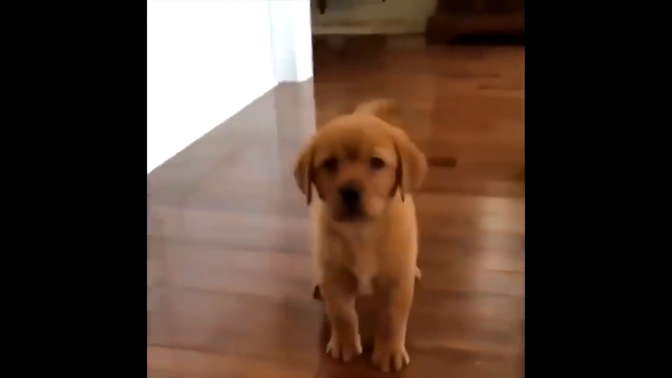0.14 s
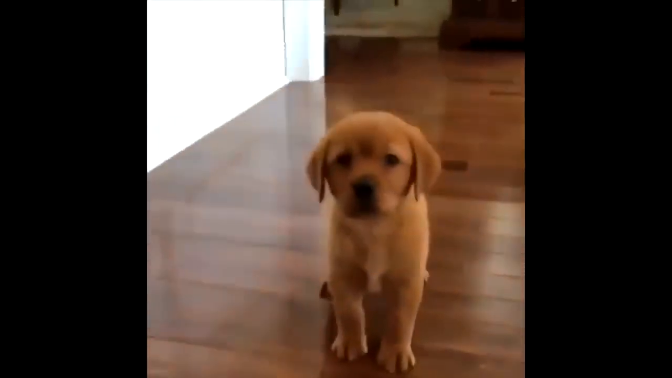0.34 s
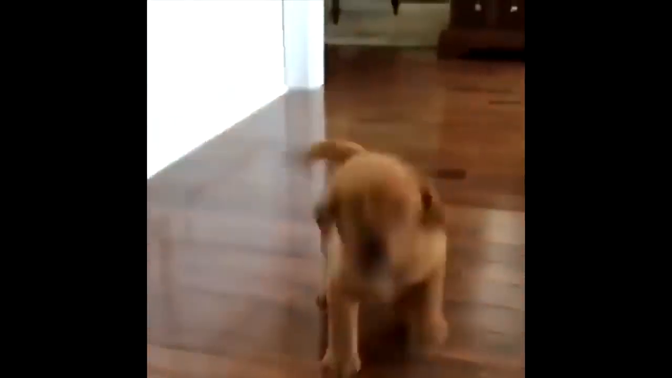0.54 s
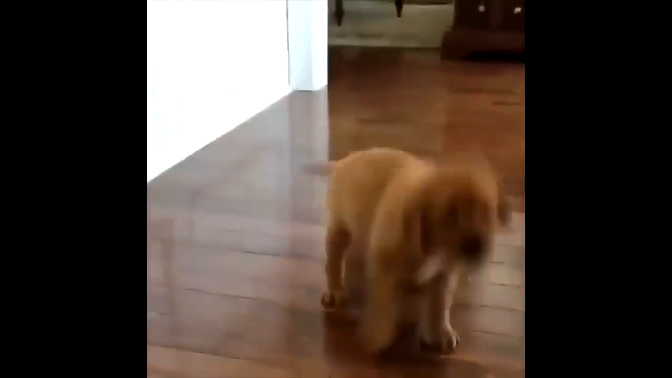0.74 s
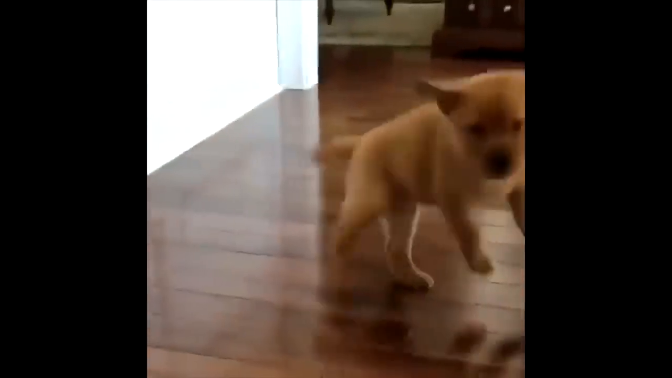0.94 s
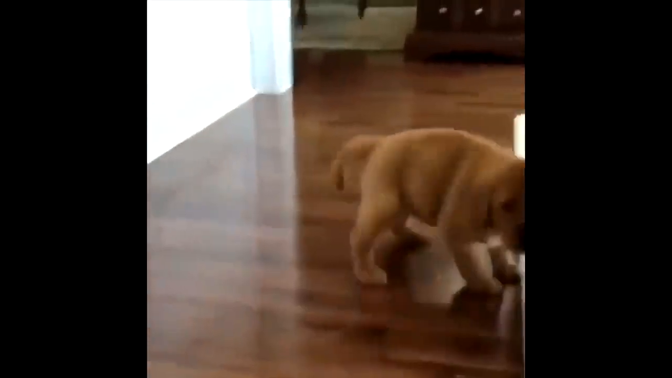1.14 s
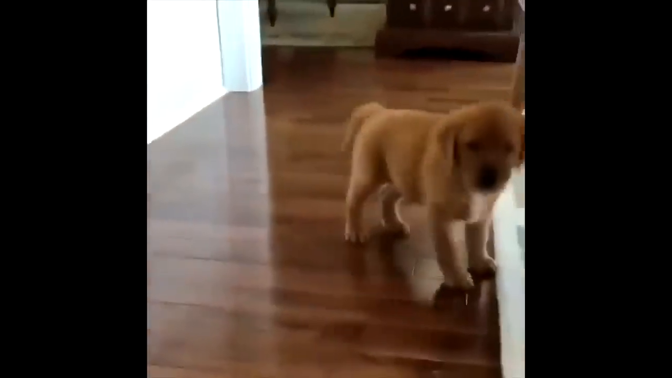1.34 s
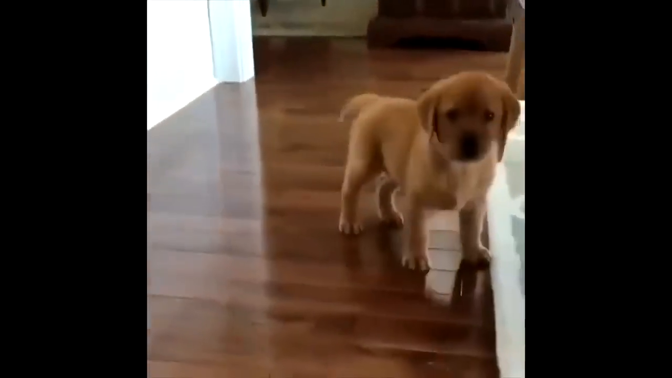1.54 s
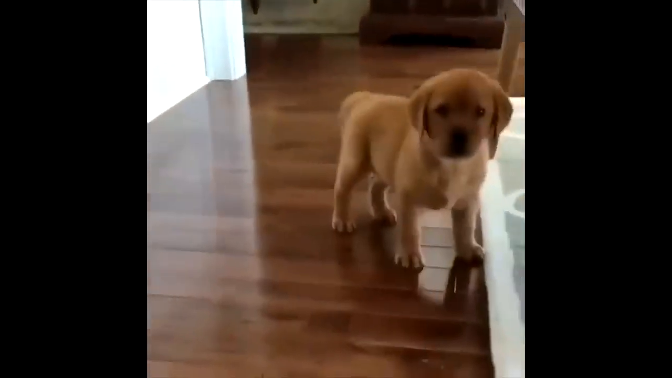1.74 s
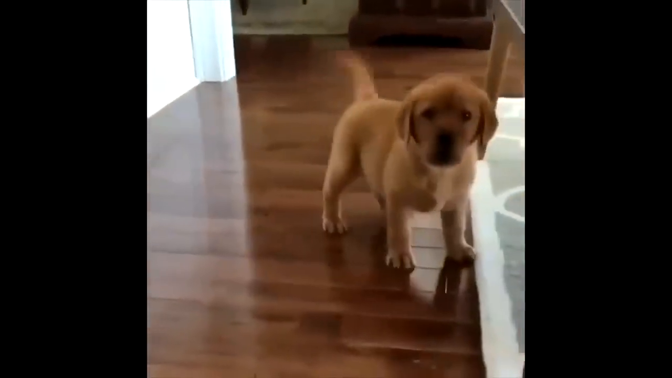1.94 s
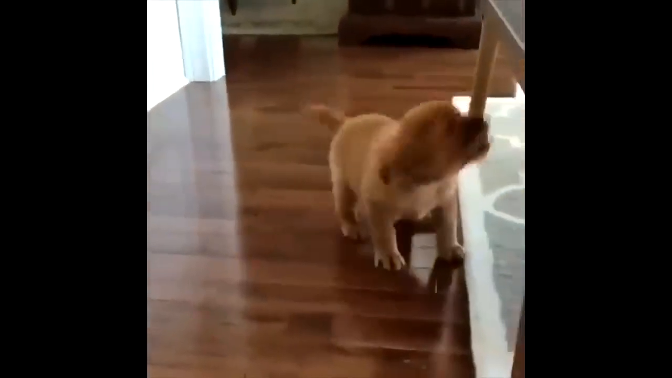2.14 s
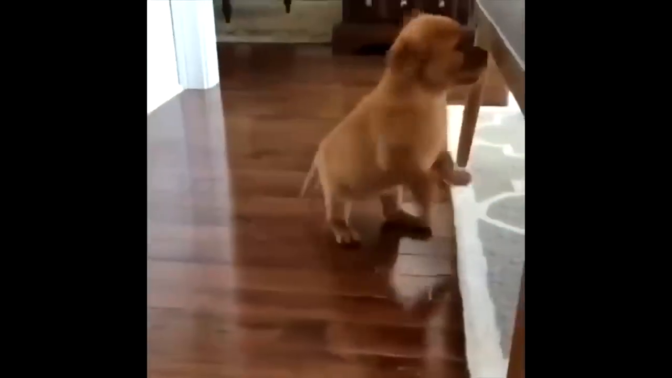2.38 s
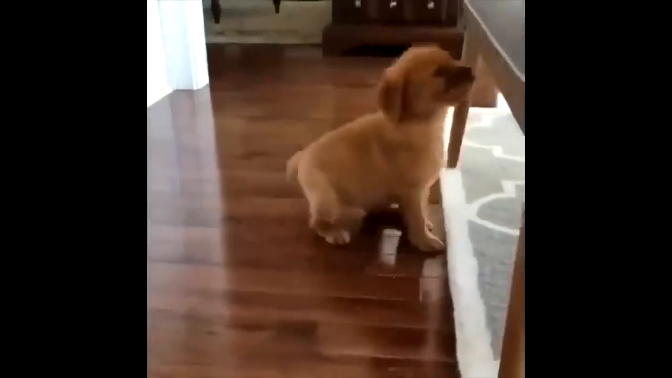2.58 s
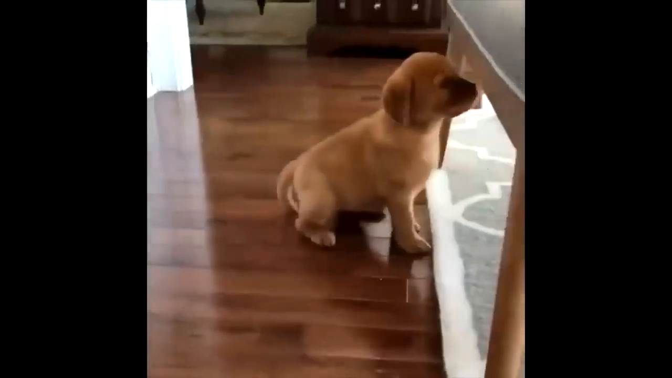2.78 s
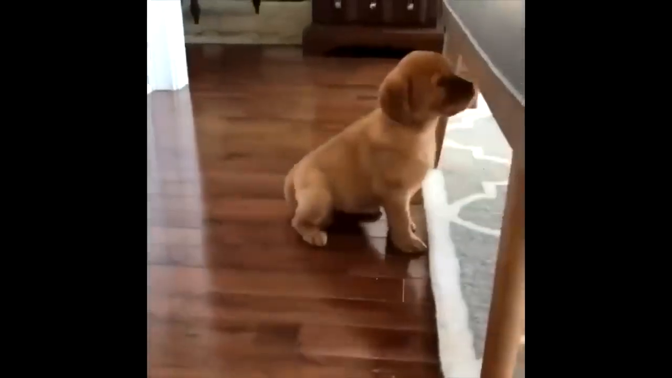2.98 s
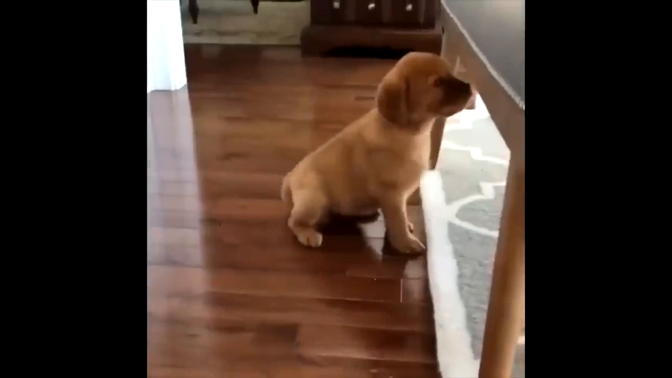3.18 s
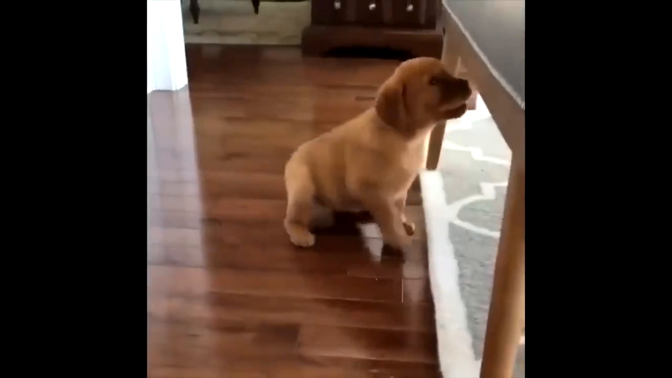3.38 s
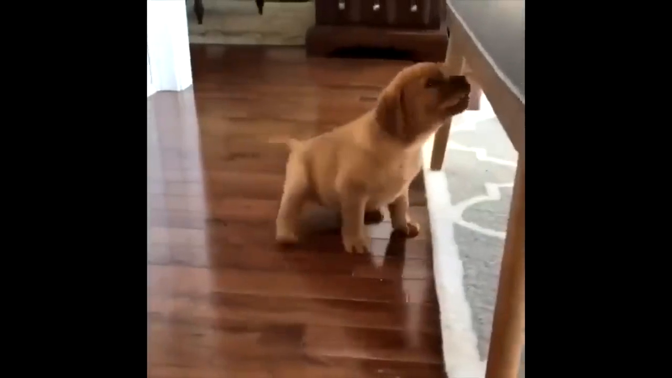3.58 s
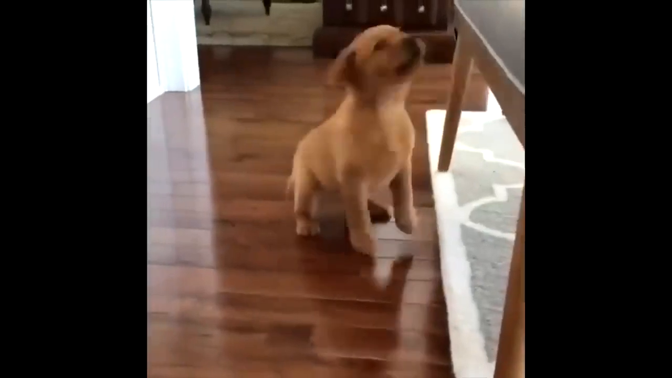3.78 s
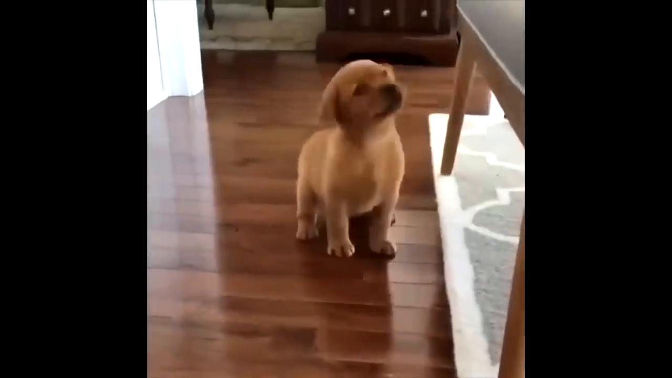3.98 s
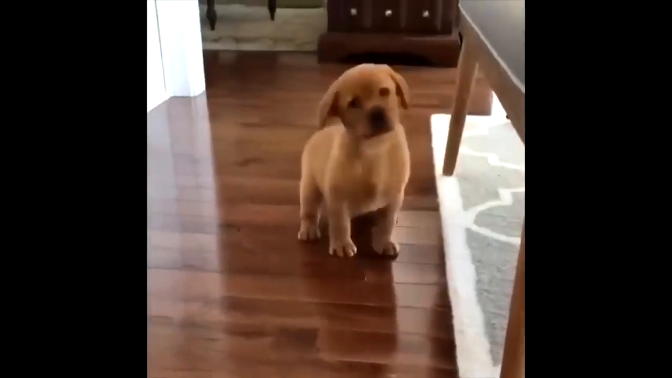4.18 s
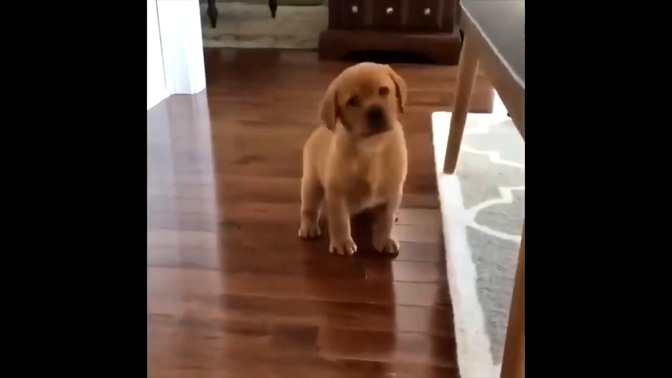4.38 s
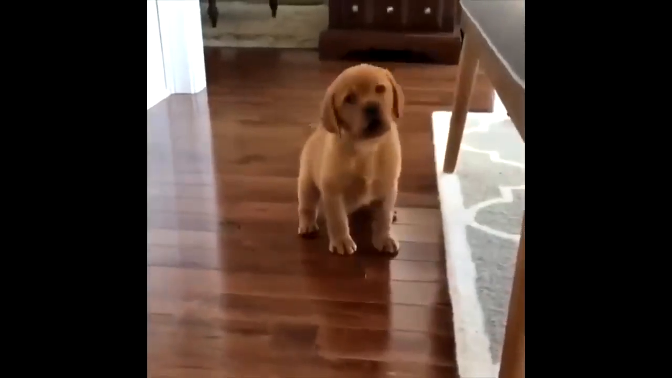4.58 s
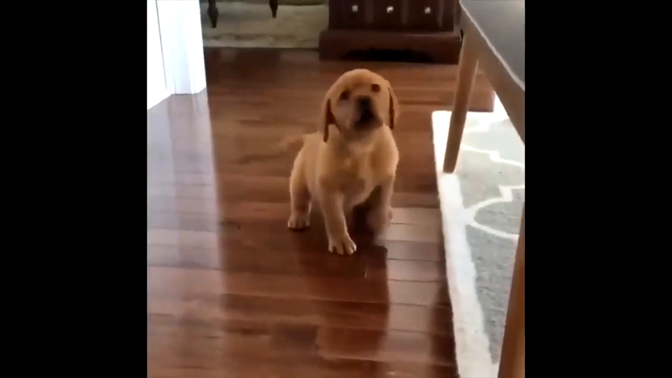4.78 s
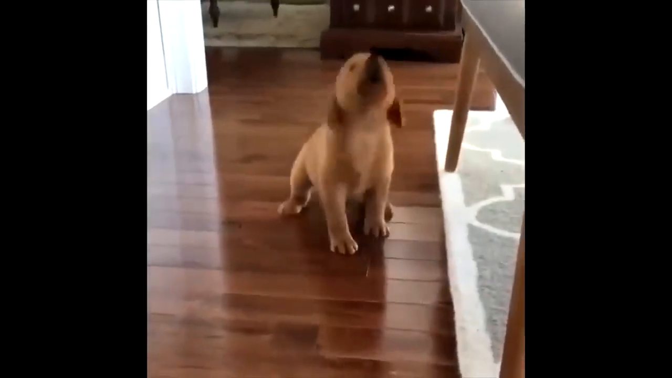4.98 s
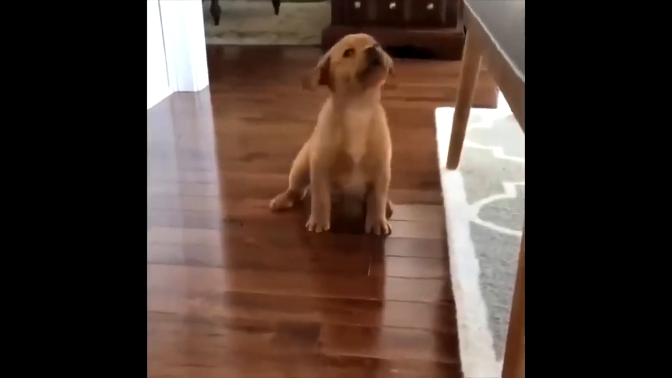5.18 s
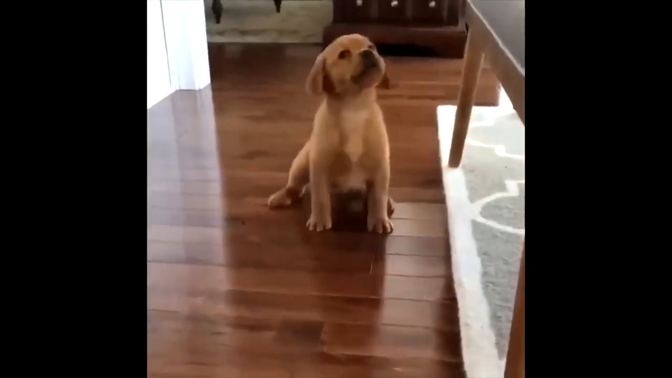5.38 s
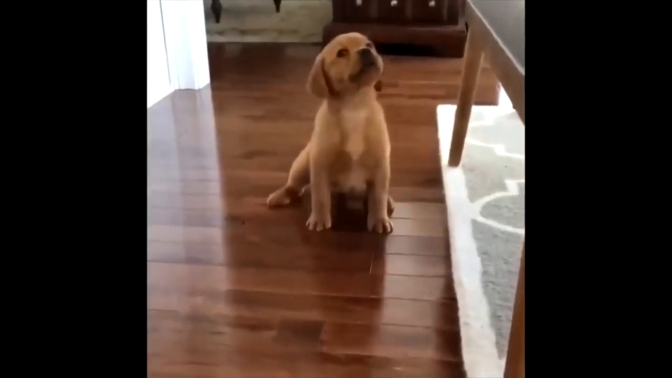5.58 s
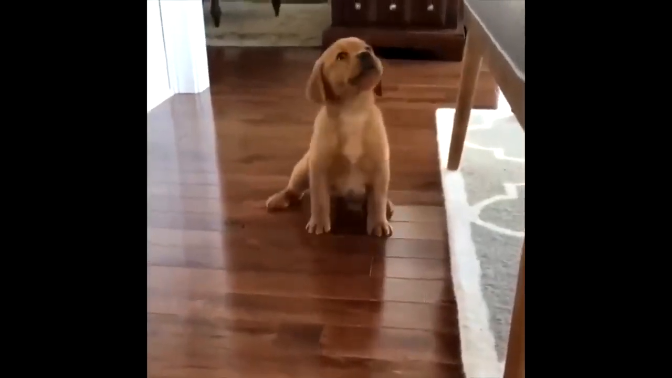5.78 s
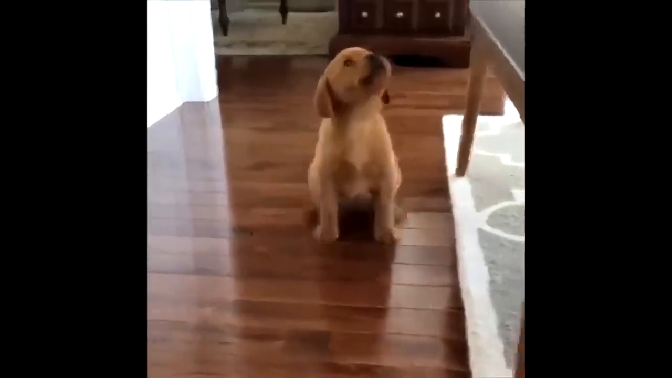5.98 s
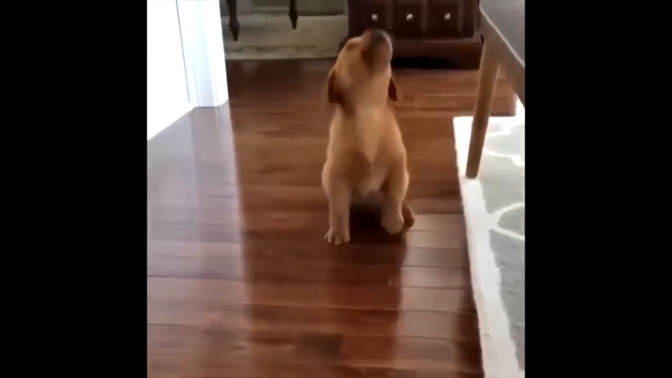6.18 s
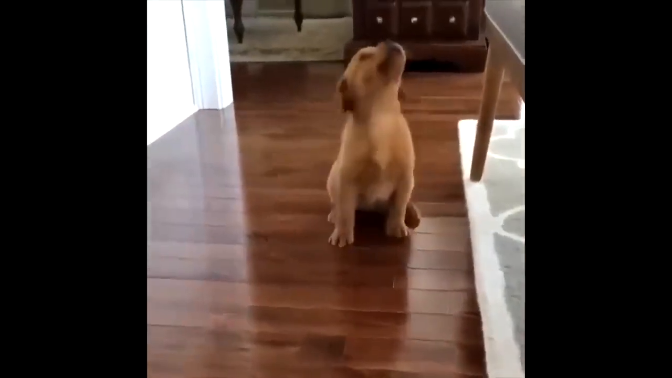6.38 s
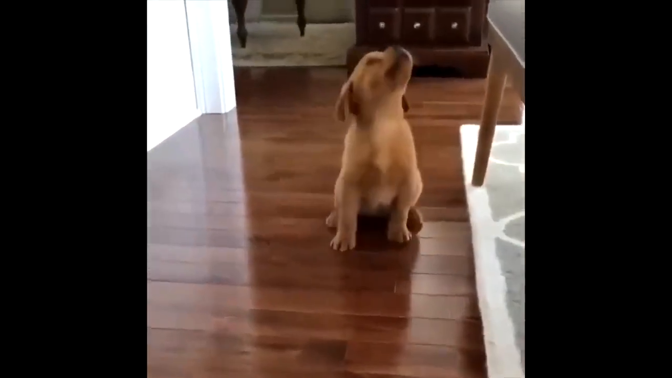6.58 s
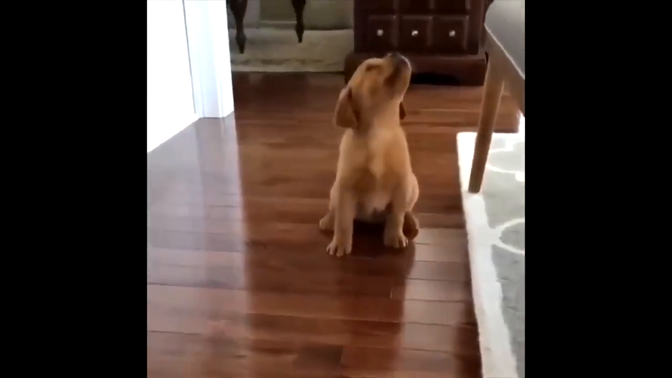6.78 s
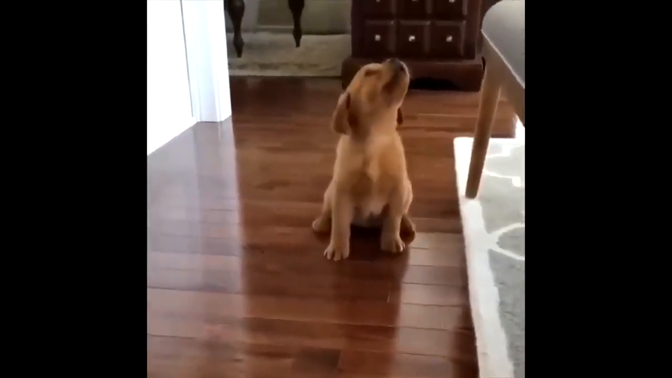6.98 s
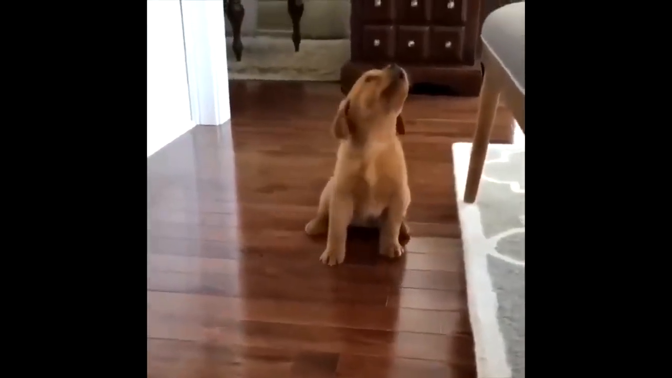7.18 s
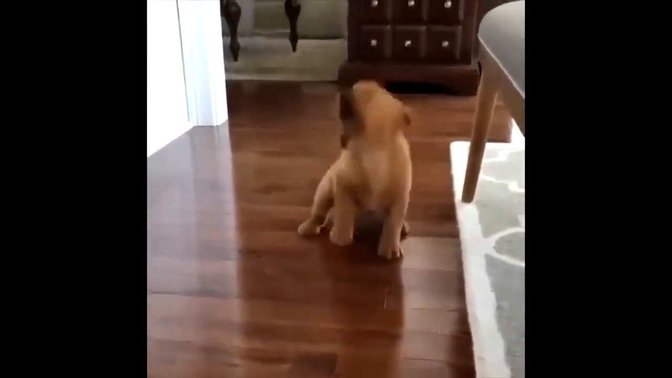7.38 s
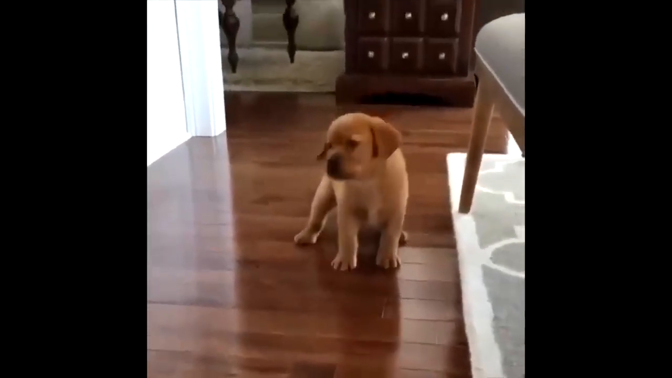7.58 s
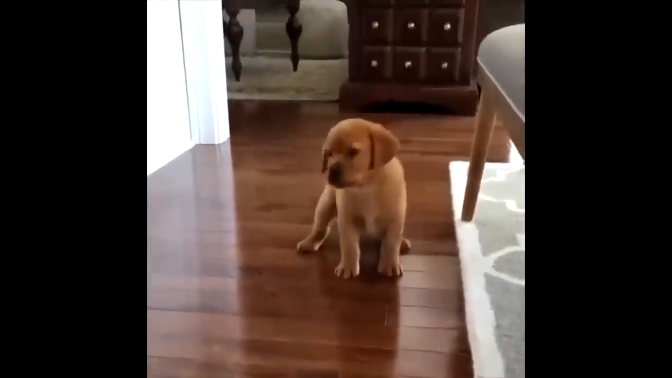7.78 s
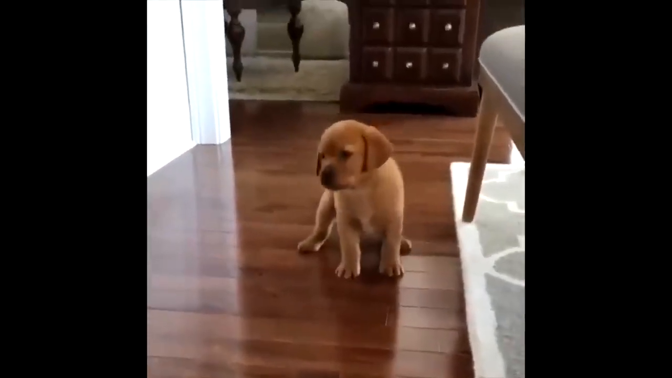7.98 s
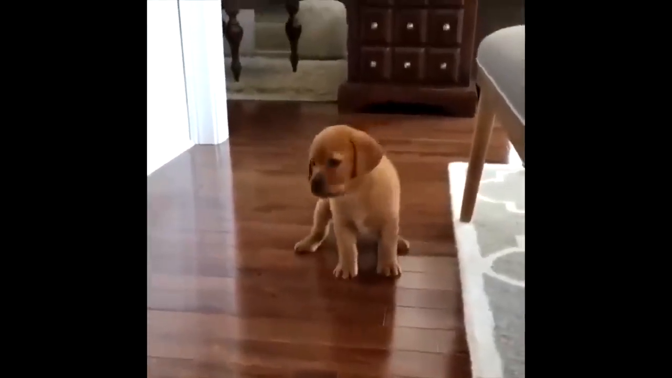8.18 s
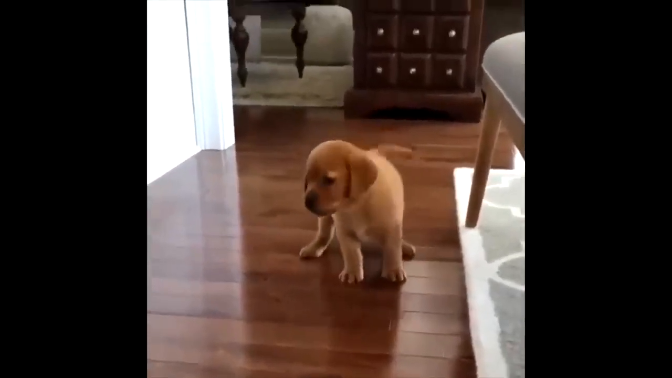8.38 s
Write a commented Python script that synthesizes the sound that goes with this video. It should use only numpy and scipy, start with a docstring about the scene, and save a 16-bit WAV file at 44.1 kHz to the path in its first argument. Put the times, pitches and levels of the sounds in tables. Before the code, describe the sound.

Indoors, in a lively room with a hard wooden floor, a quiet low ventilation hum runs throughout. Claws and pads tap, then a puppy gives six single barks a little over a second apart, each jumping from hoarse grunt to yelp. A tiny squeak and paw slide precede the third, and a low fluttering growl swells into the fifth. The microphone is a few steps away and catches clear room ringing.

```python
"""A puppy barks six times in a ringing room with a wooden floor, over a quiet steady ventilation hum.
Claws and pads tap filtered-noise clicks and thuds from the floor before the first bark and between later ones.
Each bark leaps from a hoarse grunt to a yelp and drops: vocal-fold harmonics and pulsed air through a moving tract.
A tiny squeak and a sliding paw come before the third bark, and a fluttering low growl leads into the fifth.
A faint lip smack and one more slide precede the last; each pose aims the treble anew, with its own reflections."""
import sys
import numpy as np
from scipy import signal
from scipy.fft import rfft, irfft, next_fast_len
from scipy.io import wavfile
from scipy.ndimage import uniform_filter1d, minimum_filter1d, map_coordinates

SR = 44100
rng = np.random.default_rng(int(sys.argv[2]) if len(sys.argv) > 2 else 0)


def int16_out(signal):
    """Quantize to a 16-bit WAV file."""
    q = np.round(np.clip(np.atleast_2d(signal).T, -1, 1) * 32767)
    wavfile.write(sys.argv[1], SR, q.astype(np.int16))


N = 372201
TIME = np.arange(N) / SR


def amp(db):
    """Decibels to gain."""
    return 10 ** (np.asarray(db) / 20)


def unit(x):
    """Scale to rms 1."""
    return x / np.sqrt(np.mean(x ** 2) + 1e-20)


def along(points, hz):
    """Read a curve of (frequency [Hz], value) points on a log frequency axis."""
    point_hz, values = np.transpose(points)
    return np.interp(np.log(hz + 1), np.log(point_hz), values)


def add(track, s, x):
    """Mix x into the track at time s."""
    part = track[round(s * SR):][:len(x)]
    part += x[:len(part)]


def span(s, length):
    """The sample times of an event, and its progress from 0 to 1."""
    t = TIME[round(s * SR):round((s + length) * SR)]
    return t, (t - s) / length


def ramp(t, length):
    """Climb from 0 to 1 in the given time, then stay."""
    return np.clip(t / length, 0, 1)


def envelope(t, attack_s, release_s, depth_db=22):
    """Attack, hold and release, in dB under the held level."""
    return depth_db * (ramp(t - t[0], attack_s) + ramp(t[-1] - t, release_s) - 2)


def wobble(t, rate):
    """A smooth random curve with rate knots a second."""
    return map_coordinates(rng.standard_normal(2048), [(t - t[0]) * rate], mode="wrap")


def filtered(x, response):
    """Shape the spectrum of x by a response given as a function of frequency."""
    m = next_fast_len(len(x) + 8192)
    return irfft(rfft(x, m) * response(np.fft.rfftfreq(m, 1 / SR)), m)[:len(x)]


def noise(spectrum, size):
    """Coloured noise of rms 1."""
    white = np.random.default_rng(rng.integers(2 ** 31)).standard_normal(size)
    return unit(filtered(white, lambda hz: amp(along(spectrum, hz))))


def resonances(modes, hz):
    """Response of a resonating body: a sum of damped modes with alternating sign."""
    total = 0
    for k, (center, width, db) in enumerate(modes):
        mode = 1j * hz * width / (center * center - hz * hz + 1j * hz * width)
        total = total + (-1) ** k * amp(db) * mode
    return total


def ventilation(air_db=-66):
    """Steady low air noise with two faint fan tones that drift in phase."""
    # colour of the moving air: (frequency [Hz], relative level [dB])
    air_colour = [(12, -56), (20, -24.5), (30, -17), (49, -17), (87, -7.5), (242, -15), (347, -9.5),
                  (470, -27), (511, -18), (555, -22.5), (774, -22.5), (2040, -29), (5230, -33),
                  (12700, -33.5), (15000, -50.5)]
    # fan tones: (frequency [Hz], rms level [dB])
    fan_tones = [(58, -70), (512, -78)]
    tones = np.zeros(N)
    for hz, db in fan_tones:
        tones += amp(db) * np.sqrt(2) * np.sin(2 * np.pi * hz * TIME + .6 * wobble(TIME, 2.2))
    trim = [(30, -2), (70, 0), (1200, 0), (4000, -3)]  # (frequency [Hz], gain [dB])
    air = filtered(noise(air_colour, N), lambda hz: amp(along(trim, hz)))
    return amp(air_db) * air + tones


def small_contacts(ring_width_hz=330, ring_db=2, thud_t60=.11):
    """Claws and pads click and thud on the floor, a lip smacks faintly at 7.095 s, and twice a paw slides."""
    # small contacts, claws and pads on the floor and at 7.095 s a faint lip smack:
    # (time [s], click level [dB], click t60 [s], thud level [dB], click brightness [dB], own ring [Hz])
    contacts = [(.725, -36.5, 0.17, -30.5, 0.5, 1030), (.746, -29, .06, -29.5, -3, 930),
                (.785, -35, .04, -56, 7, 3340), (1.232, -45, 0.054, -50.5, 17, 1300),
                (1.272, -51.5, 0.033, -48.5, 14, 1700), (2.166, -36, 0.0065, -44, 28, 4406),
                (2.192, -20, 0.028, -49.5, -0.5, 1780), (3.549, -34, 0.12, -35, -6, 1156),
                (4.844, -37.5, 0.029, -36, 15.5, 4530), (4.85, -27, 0.08, -34.5, -1, 1047),
                (7.095, -46, 0.16, -52, -2, 1056)]
    # modes that all the clicks share: (frequency [Hz], width [Hz], level [dB])
    shared_modes = [(1300, 900, -3.5), (2450, 500, -6.5), (4000, 810, -11), (9000, 3800, -25.5)]
    # low modes of the thuds: (frequency [Hz], width [Hz], level [dB])
    thud_modes = [(98.6, 50, -3.5), (183.4, 75, 0), (330.4, 120, -10.5), (620, 83, -7.5)]
    # slipping paws: (time [s], length [s], level [dB])
    slips = [(3.56, 0.14, -59.5), (7.223, .12, -55)]
    # colour of a paw rubbing on wood: (frequency [Hz], relative level [dB])
    rub_colour = [(350, -52.5), (600, -28.5), (964, -1.5), (1840, -9.5), (2390, -6.5), (5210, -14),
                  (5790, -19.5), (9180, -14), (14000, -49.5)]
    tilt = [(1000, 0.028), (5000, 0.97)]  # (frequency [Hz], share of the brightness)
    out, t = np.zeros(N), TIME[:SR // 4]
    for s, click_db, click_t60, thud_db, bright_db, ring_hz in contacts:
        click_modes = [(ring_hz, ring_width_hz, ring_db)] + list(shared_modes)
        click = (click_modes, click_db, click_t60, bright_db)
        thud = (thud_modes, thud_db, thud_t60, 0)
        for modes, db, t60, tilt_db in (click, thud):
            fade = amp(-60 * t / t60)
            burst = fade * rng.standard_normal(len(t))
            ring = filtered(burst, lambda hz: resonances(modes, hz) * amp(tilt_db * along(tilt, hz)))
            add(out, s, amp(db) * unit(ring) * np.sqrt(np.mean(fade ** 2)))
    for s, length, db in slips:
        t, _ = span(s, length)
        level_db = db + envelope(t, attack_s=.03, release_s=0.07) + 2.8 * wobble(t, 300)
        add(out, s, amp(level_db) * noise(rub_colour, len(t)))
    return out


def whine(octave_db=1, under_db=-4, hoarse_db=-3):
    """A tiny hoarse squeak that sags in pitch: a tone, its octaves above and below, and breath noise."""
    # the squeak: (start pitch [Hz], end pitch [Hz], level [dB])
    squeak_glide = (760, 430, -42.5)
    # when it sounds: (time [s], length [s])
    squeak_span = (3.487, .072)
    breath_colour = [(120, -11.5), (300, 2.5), (700, -15.5), (1400, -12.0), (2500, -33)]  # ([Hz], [dB])
    out = np.zeros(N)
    start_hz, end_hz, db = squeak_glide
    t, progress = span(*squeak_span)
    pitch = start_hz + (end_hz - start_hz) * progress
    phase = 2 * np.pi * np.cumsum(pitch * (1 + .07 * wobble(t, 400))) / SR
    tone = amp(under_db) * np.sin(phase / 2) + np.sin(phase) + amp(octave_db) * np.sin(2 * phase)
    squeak = unit(tone) + amp(hoarse_db) * noise(breath_colour, len(t))
    level_db = db + envelope(t, attack_s=0.014, release_s=0.013)
    add(out, t[0], amp(level_db) * unit(squeak))
    return out


def growl(flutter_hz=26, flutter_db=7.0, hoarse_db=-2, octave_db=-9, build_s=0.18, jitter=.19):
    """A closed-mouth growl: a hoarse low tone that climbs and firms up, shaken by slow flaps of the throat."""
    # the climb: (start pitch [Hz], end pitch [Hz], level [dB], crescendo [dB])
    growl_climb = (178, 239.5, -58, 32)
    # when it sounds: (time [s], length [s])
    growl_span = (5.63, .605)
    # colour of the air with the mouth shut: (frequency [Hz], relative level [dB])
    chest_colour = [(50, -30.5), (110, -6), (200, -7), (310, -6), (400, 0.5), (600, -15), (950, -18),
                    (1500, -31), (2500, -51.5)]
    out = np.zeros(N)
    start_hz, end_hz, db, crescendo_db = growl_climb
    t, _ = span(*growl_span)
    effort = np.exp((t - t[-1]) / build_s)
    pitch = start_hz + (end_hz - start_hz) * effort
    phase = 2 * np.pi * np.cumsum(pitch * (1 + jitter * wobble(t, 220))) / SR
    slack = pitch[0] / pitch  # tighter folds leak less air
    tone = unit(np.sin(phase) + amp(octave_db) * np.sin(2 * phase))
    air = amp(hoarse_db) * slack ** 2 * noise(chest_colour, len(t))
    flaps = np.cos(2 * np.pi * np.cumsum(flutter_hz * (1 + wobble(t, 11) / 20)) / SR)
    shaken = (tone + air) * amp(flutter_db * slack * flaps)
    level_db = db + crescendo_db * effort + envelope(t, attack_s=0.031, release_s=.015)
    add(out, t[0], amp(level_db) * unit(shaken))
    return out


def tract(hz, mouth_hz, throat_hz, bright_db,
          mouth_db=10, mouth_width_hz=200, throat_db=10.0, throat_width_hz=170):
    """Gain of the vocal tract: jaw and tongue move two resonances, and a wide mouth lets out more treble."""
    # fixed colour of throat and muzzle: (frequency [Hz], relative level [dB])
    muzzle_colour = [(90, -29), (210, 0.5), (420, -10.5), (600, -11), (900, 3.5), (1150, -4.5), (2450, -10),
                     (3500, -18), (4500, -17), (4950, -34), (6700, -29), (7800, -41.5), (9000, -39.5),
                     (13000, -35.5)]
    bright_weight = [(900, 0.32), (1800, 1.5), (4000, 2.7), (9000, 1.0)]  # (frequency [Hz], factor)
    mouth = mouth_db / (1 + ((hz - mouth_hz) / mouth_width_hz) ** 2)
    throat = throat_db / (1 + ((hz - throat_hz) / throat_width_hz) ** 2)
    return amp(along(muzzle_colour, hz) + mouth + throat + bright_db * along(bright_weight, hz))


def folds(t, phase, pitch, rough, shape, halves_db=0, slope_db=-3, chest_db=3):
    """Harmonics of the vocal folds; when rough, alternate cycles differ and lines appear halfway."""
    k = np.arange(2, 25)[:, None] / 2  # harmonic numbers, with the halves between
    halves = np.where(k % 1 > 0, amp(halves_db) * np.sqrt(rough), 1)
    gains = tract(k * pitch, *shape) * halves * amp(slope_db * np.log2(k))
    # the chest radiates a low fundamental
    gains = gains * amp(chest_db * np.clip(1.5 - pitch / 350, 0, 1) * (k == 1))
    gains = gains / np.linalg.norm(gains, axis=0)
    partials = gains * np.sin(k * phase + rng.uniform(0, 2 * np.pi, k.shape))
    tone = np.sqrt(2) * np.sum(partials, axis=0)
    return tone * amp(1.5 * rough * wobble(t, 260))


def rasp(phase, pitch, shape, gating=.7, under_db=-17):
    """Turbulent air, let through once a cycle, shaped by the vocal tract and weak under the pitch."""
    puffs = rng.standard_normal(SR // 2)[:len(phase)] * (1 + gating * np.cos(phase))
    hz, s, z = signal.stft(puffs, SR, nperseg=512, noverlap=384)
    hz = hz[:, None]
    frame = np.minimum(np.round(s * SR).astype(int), len(phase) - 1)
    gains = tract(hz, *np.array(shape)[:, frame]) * amp(under_db / (1 + (hz / pitch[frame]) ** 6))
    gains = gains / np.linalg.norm(gains, axis=0)
    air = signal.istft(z * gains, SR, nperseg=512, noverlap=384)[1]
    return unit(air[:len(phase)])


def voice(t, pitch, rough, shape, waver=.05, jitter=.042, leak=.38):
    """Vocal folds and leaking air through the vocal tract; slack folds at a low pitch flap and leak most."""
    rough = np.clip(rough, .01, .9)
    slack = 900 / pitch
    pitch = pitch * (1 + waver * rough * wobble(t, 90))  # a young voice is unsteady
    flapping = 1 + jitter * rough * slack ** .7 * wobble(t, 420)
    phase = 2 * np.pi * np.cumsum(pitch * flapping) / SR
    air = np.clip(leak * rough * np.sqrt(slack), 0, 1)  # share of the power
    tone = folds(t, phase, pitch, rough, shape)
    return np.sqrt(1 - air) * tone + np.sqrt(air) * rasp(phase, pitch, shape)


def barks():
    """Each bark leaps from a rough, wide-jawed grunt to a clearer yelp that swells, then drops and fades."""
    # one bark a row: (time [s], rise [s], hold [s], attack [s], release [s], jaw wide for [s],
    # grunt pitch [Hz], yelp start pitch [Hz], yelp end pitch [Hz], level before the scene's mix [dB],
    # yelp swell [dB], yelp roughness [0-1], mouth resonance [Hz], throat resonance [Hz],
    # throat resonance with the jaw wide [Hz], brightness before the tract's weighting [dB],
    # extra brightness with the jaw wide, likewise [dB])
    bark_rows = [ (0.804, .04, .063, 0.0091, 0.062, .026, 376, 620, 1073, -11.5, -2, .48, 1891, 2813, 4357, 1, 10),
                 (2.343, .046, .054, 0.0092, .056, 0.025, 400.1, 906, 877.3, -15.5, 1.5, 0.3, 1688, 2378, 2041, -5.5, 8),
                 (3.784, .05, .076, .048, 0.042, .05, 201.1, 854, 933.6, -11.5, 6, .19, 1470, 2274, 2900, -5, 7),
                 (5.085, .033, .088, .028, .012, 0.044, 183.1, 967.5, 906.2, -12, 5, 0.3, 1439, 2370, 3341, -5.5, 16),
                 (6.184, .073, .072, .062, .064, .06, 221.5, 925.5, 849.6, -12.5, 5.5, .08, 1354, 2188, 2255, -2, 0.5),
                 (7.468, .07, .092, .078, .06, .07, 230.6, 777.7, 1037, -13.5, 8, .07, 1694, 2517, 3053, -2.5, 2.5)]
    tense_s = .018  # time constant of the pitch's leap from grunt to yelp
    # the folds rattle, lock into a tone with this time constant, and loosen again
    grunt_rough, fall_rough, lock_s = .85, .7, .014
    jaw_s, mouth_lift_hz = .012, 254  # the jaw relaxes this fast; while wide it raises the mouth resonance
    fall_s, fall_octaves = 0.069, 1.05  # the final drop as the breath runs out
    arch_hz = 4  # the pitch bows up in mid-yelp
    attack_power, fade_db, fade_power = 1.6, 20, 1.6
    soft_dull_db = 5  # duller while the voice starts and fades, before the tract's weighting
    waver_db = 3.1  # unsteady brightness, before the tract's weighting
    out = np.zeros(N)
    for (s, rise, hold, attack, release, wide, grunt_hz, start_hz, end_hz, db, swell_db,
         yelp_rough, mouth_hz, throat_hz, wide_hz, bright_db, bite_db) in bark_rows:
        t, _ = span(s, rise + hold + fall_s)
        age = t - s - rise  # time since the yelp began
        held, spent = ramp(age, hold), ramp(age - hold, fall_s)
        onset, fade = ramp(t - s, attack), ramp(age - hold, release)
        push = np.sin(np.pi * held) ** 2

        glide = np.sin(np.pi * held / 2) ** 2
        yelp_hz = start_hz + (end_hz - start_hz) * glide + arch_hz * push
        tension = np.exp(np.minimum(age, 0) / tense_s)
        pitch = (grunt_hz + (yelp_hz - grunt_hz) * tension) * 2 ** (-fall_octaves * spent)

        gain = onset ** attack_power * amp(db + swell_db * push - fade_db * fade ** fade_power)
        rattle = np.exp(-np.maximum(age, 0) / lock_s)
        rough = yelp_rough + (grunt_rough - yelp_rough) * rattle + (fall_rough - yelp_rough) * spent

        jaw = (1 - np.tanh((t - s - wide) / jaw_s / 2)) / 2  # 1 wide, 0 relaxed
        softness = 1 - onset + fade
        treble_db = bright_db + bite_db * jaw - soft_dull_db * softness + waver_db * wobble(t, 70)
        shape = [mouth_hz + mouth_lift_hz * jaw, throat_hz + (wide_hz - throat_hz) * jaw, treble_db]
        add(out, s, gain * voice(t, pitch, rough, shape) * signal.windows.tukey(len(t), .05))
    return out


def room(near_db=-4, early_db=-14, tail_db=-15.5, near_t60=0.035, early_t60=0.13, beam_hz=2300):
    """One spot's answer: floor and furniture reflect at once, the walls ring on."""
    # decay of the room: (frequency [Hz], t60 [s])
    ring_t60 = [(100, 1), (450, 0.76), (900, 0.76), (1300, 0.78), (2300, 0.76), (4000, 0.64), (7000, 0.87),
                (13000, 0.71)]
    # colour of the ringing: (frequency [Hz], relative level [dB])
    wall_colour = [(150, 1.5), (500, 6), (900, 0.5), (1400, -0.5), (2400, -1.5), (4000, -3), (10000, -2.5)]
    t = TIME[:SR]
    # the muzzle beams its treble aside, so much of that arrives off the floor and the chair
    near = rng.standard_normal(SR) * (rng.random(SR) < 1 / 20) * amp(-60 * t / near_t60)
    near = signal.sosfilt(signal.butter(2, beam_hz, "high", fs=SR, output="sos"), near)
    early = rng.standard_normal(SR) * (rng.random(SR) < 1 / 50) * amp(-60 * t / early_t60) * (t > .002)
    hz, s, z = signal.stft(rng.standard_normal(SR), SR, nperseg=256)
    fade_db = along(wall_colour, hz)[:, None] - 60 * s / along(ring_t60, hz)[:, None]
    tail = signal.istft(z * amp(fade_db), SR, nperseg=256)[1][:SR]
    tail = tail * (1 - np.exp(-t / 0.0013))
    paths = ((near_db, near), (early_db, early), (tail_db, tail))
    return sum(amp(db) * path / np.linalg.norm(path) for db, path in paths)


def heard(x):
    """Every pose aims the treble differently and meets new reflections; the direct sound is a little dull."""
    # where the puppy stands and points its muzzle: (time [s], room level [dB],
    # edge at 3.5 kHz [dB], hiss at 10 kHz [dB])
    muzzle_poses = [(0, 4.5, -4.5, 2.5), (2.331, 4, -2.5, -6.5), (3.3, 1.5, -6.5, -3), (4.7, 2, -4.5, 0),
                    (5.899, 3, -5.5, 2), (7.0, 4.5, -4.5, 0.5)]
    dull = [(1500, -1.5), (3000, -2), (6000, -2.0)]  # direct sound: (frequency [Hz], gain [dB])
    out = np.zeros(N)
    starts = [0] + [round(pose[0] * SR) for pose in muzzle_poses[1:]]
    ends = starts[1:] + [N]
    for start, end, (_, room_db, edge_db, hiss_db) in zip(starts, ends, muzzle_poses):
        aim = [(2200, 0.0024), (3500, edge_db), (6500, 0.0073), (10000, hiss_db)]
        aimed = filtered(x[start:end], lambda hz: amp(along(aim, hz)))
        direct = filtered(aimed, lambda hz: amp(along(dull, hz)))
        add(out, start / SR, direct)
        add(out, start / SR, amp(room_db) * signal.fftconvolve(aimed, room()))
    return out


def scene(bark_db=2):
    """The puppy in its room, over the ventilation."""
    puppy = small_contacts() + whine() + growl() + amp(bark_db) * barks()
    return (ventilation() + heard(puppy))[None]


def record(dry, ceiling=1.0, top_hz=14000):
    """A fast limiter holds peaks to full scale, then a steep cut removes everything above the band limit."""
    needed = np.minimum(1, ceiling / (np.abs(dry[0]) + 1e-9))
    gain = uniform_filter1d(minimum_filter1d(needed, size=90), size=60)  # sizes in samples
    return filtered(dry[0] * gain, lambda hz: hz < top_hz)[None]


dry = scene()
out = record(dry)
int16_out(out)
```